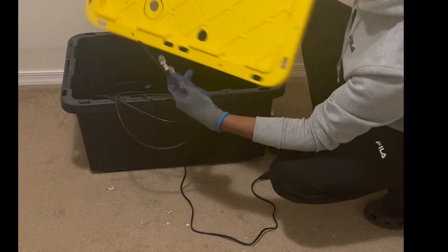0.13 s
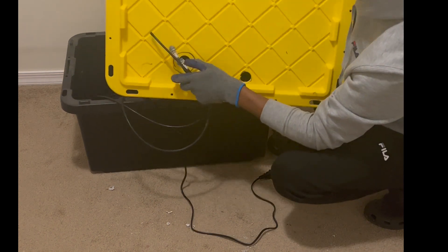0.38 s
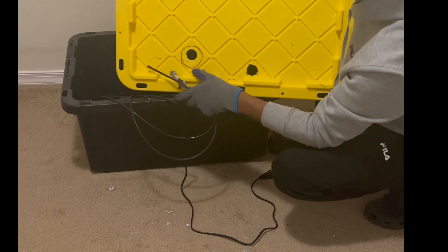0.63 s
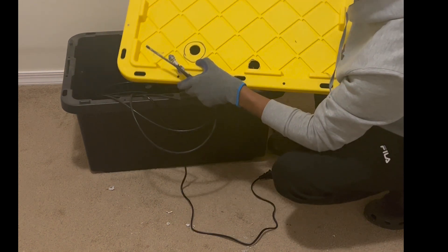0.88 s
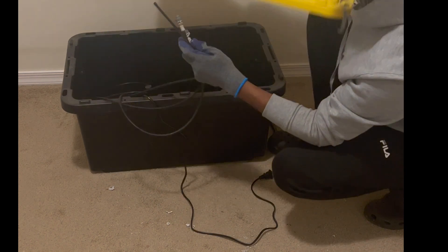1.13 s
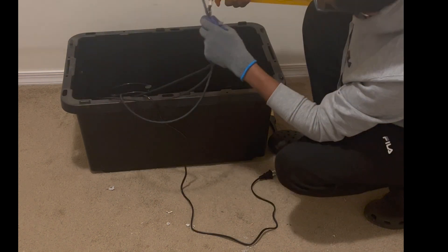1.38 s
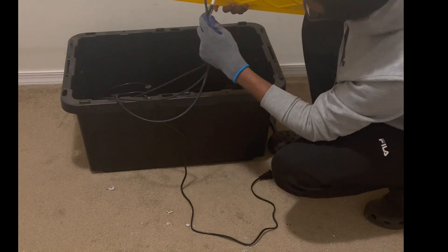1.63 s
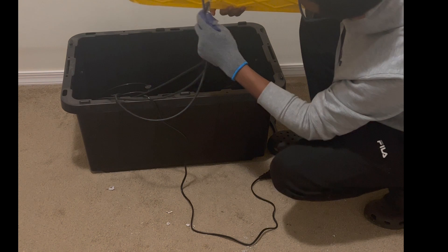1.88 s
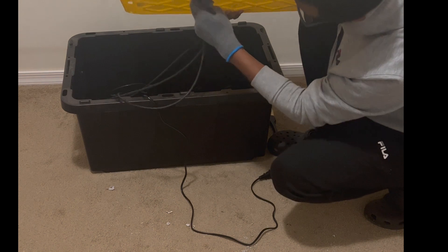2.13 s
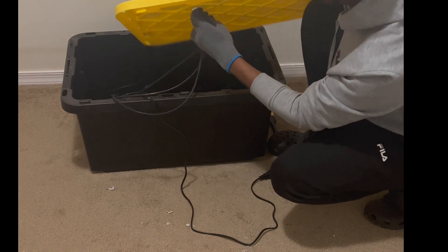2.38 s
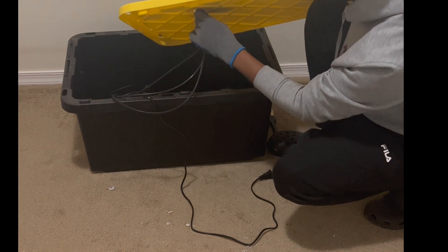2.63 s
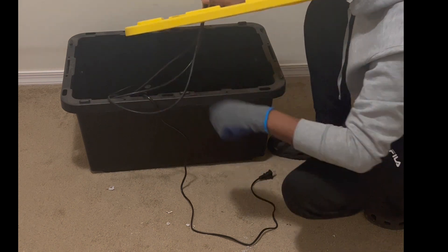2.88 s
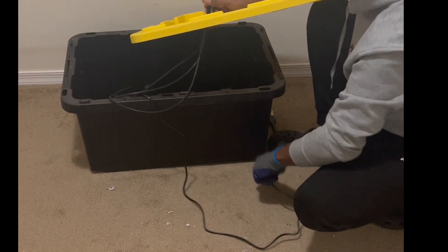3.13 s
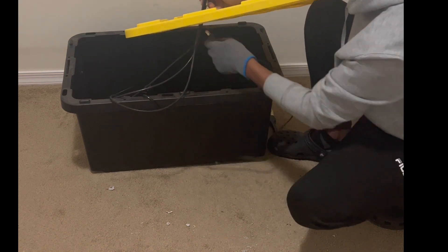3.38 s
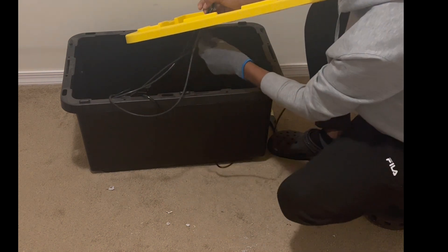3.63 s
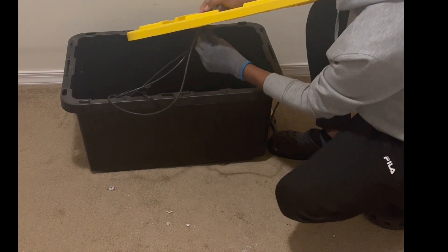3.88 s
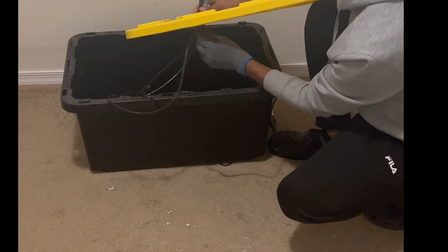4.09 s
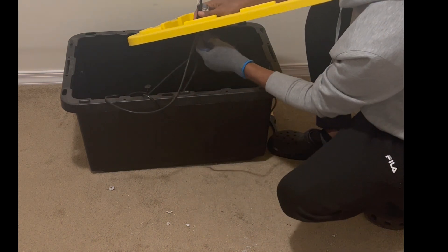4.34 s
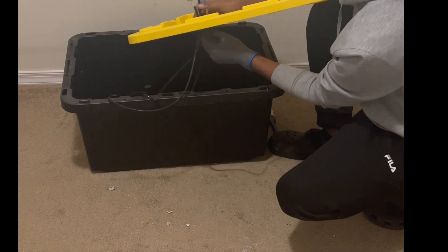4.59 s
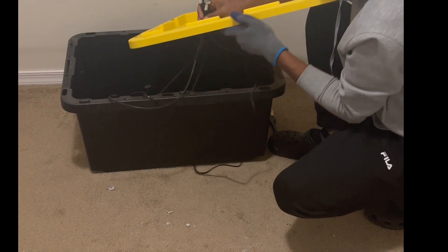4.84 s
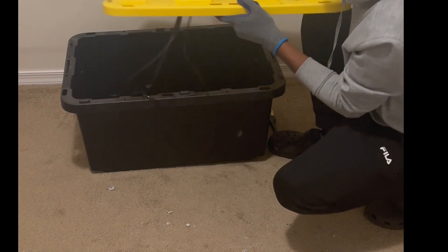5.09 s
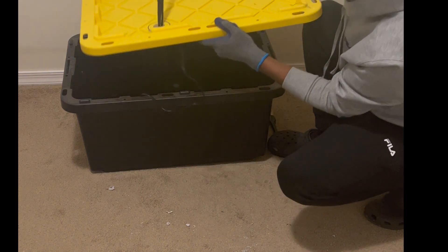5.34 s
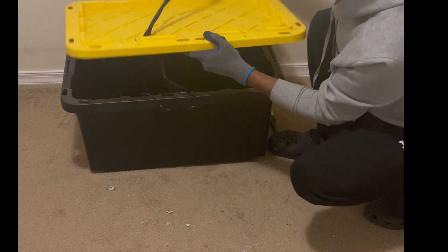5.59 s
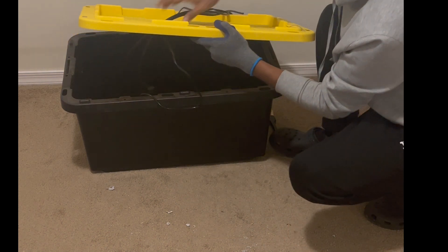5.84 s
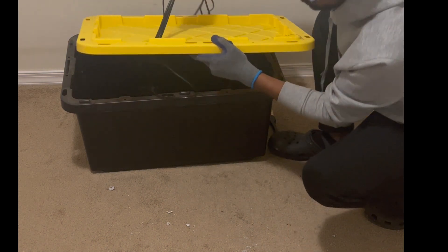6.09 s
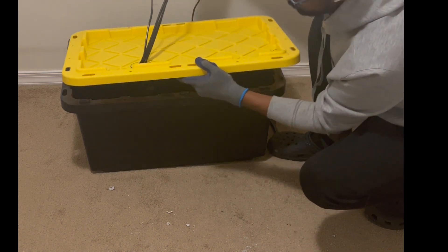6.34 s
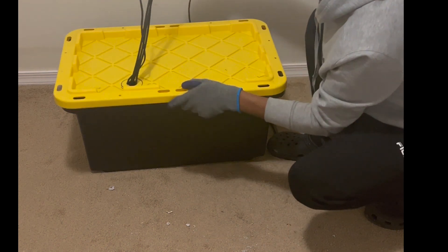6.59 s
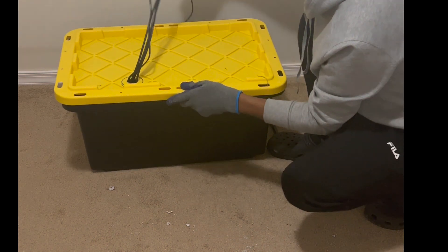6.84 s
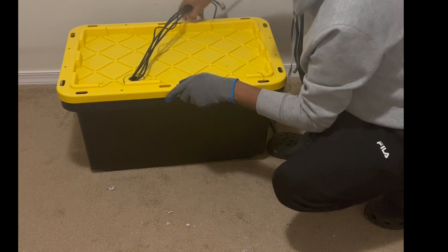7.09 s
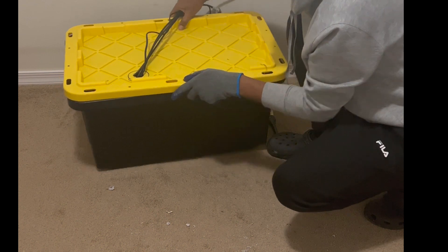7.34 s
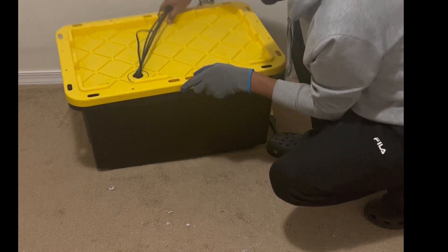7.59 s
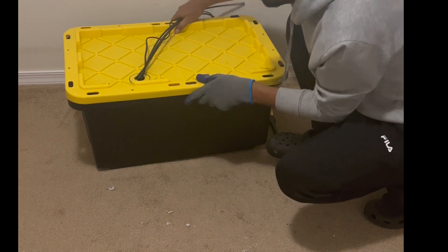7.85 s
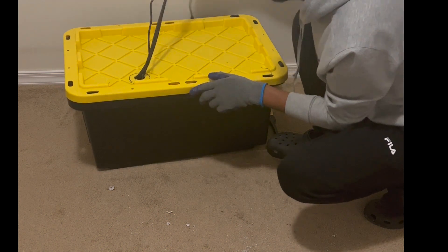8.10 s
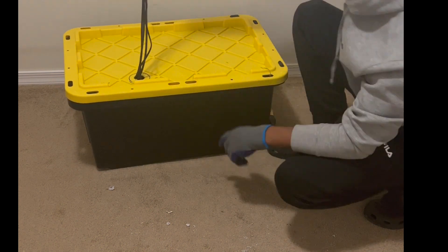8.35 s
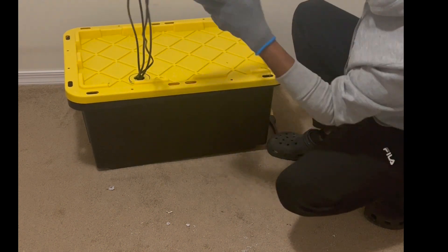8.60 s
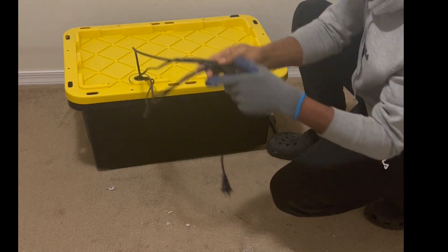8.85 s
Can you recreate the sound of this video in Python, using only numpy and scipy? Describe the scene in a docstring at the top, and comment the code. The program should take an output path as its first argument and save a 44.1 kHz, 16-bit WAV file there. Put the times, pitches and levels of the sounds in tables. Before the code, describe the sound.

Close stereo microphones in a small carpeted room, short soft echo, faint low hum and hiss. At about 0.25 s a plastic lid bumps with a clack and soft thump, then rubs and rattles until 1 s. From 1 to 2.4 s there are quiet glove scuffs, light taps and a duller knock near 1.4. A sharp clack comes at 2.5, another at 2.85, then a lull around 3. Cord and plug clicks follow at 3.4, 4.5 and 4.8 amid dry scraping. At 5.7 s a very loud hard crack rings briefly with a burst of rubbing. Scuffs lead to a heavy hollow lid bump at 6.6. From 7 to 7.85 s knocks, shaking and rubbing are dense, boxy and loud, with strong blows near 7.2, 7.65 and 7.75. A final sharp double clack falls around 8.15, then light scuffs, a small tap at 8.5 and near quiet until 9.

```python
"""In a small carpeted room, a hard plastic tote and its lid are handled close to two microphones.
A faint low hum and hiss, made of steady noise, lie underneath. Gloves and cords rub over the plastic:
streams of fine grains, plus panels shaken under the hands. Knocks of lid, rim, cords and plugs make
the panels ring like sets of dying sine tones; soft thumps shake only the lowest panels.
Noise tails add the room, and a noise gate turns down the quiet moments."""
import sys
import numpy as np
from scipy import signal
from scipy.fft import rfft, irfft, next_fast_len
from scipy.io import wavfile
from scipy.ndimage import uniform_filter1d

SR = 44100
rng = np.random.default_rng(int(sys.argv[2]) if len(sys.argv) > 2 else 0)


def amplitude_ratio(level_db):
    """Convert a level in decibels to the matching linear amplitude (field) ratio."""
    exponent = np.asarray(level_db, float) / 20
    return 10 ** exponent


def int16_out(signal):
    """Quantize to a 16-bit WAV file."""
    q = np.round(np.clip(np.atleast_2d(signal).T, -1, 1) * 32767)
    wavfile.write(sys.argv[1], SR, q.astype(np.int16))


N = 395577   # length in samples, about 9 s


def rms_one(x):
    """Scales a sound to rms 1."""
    return x / np.sqrt(np.mean(x ** 2) + 1e-20)


def at_hz(points, hz):
    """Reads a table between its rows on a log-frequency axis."""
    table = np.array(points)
    return np.interp(np.log(hz), np.log(table[:, 0]), table[:, 1])


def curves(rows):
    """Turns rows of (t/s, level/dB, ..) into gains over time, one per level column."""
    s, *columns = np.transpose(rows)
    return [amplitude_ratio(np.interp(np.arange(N) / SR, s, c)) for c in columns]


def coloured(x, spectrum):
    """Shapes a sound by a table of (f/Hz, level/dB)."""
    size = next_fast_len(len(x) + 4096)
    hz = np.arange(1, size // 2 + 2) * SR / size
    return irfft(rfft(x, size) * amplitude_ratio(at_hz(spectrum, hz)), size)[:len(x)]


def lowpass(x, hz):
    """Keeps what lies below hz, without delay."""
    return signal.sosfiltfilt(signal.butter(2, hz, fs=SR, output="sos"), x)


def ring(force, hz, t60):
    """A unit click sets a sine of height 1 ringing; it takes at least 5 ms to fall by 60 dB."""
    r, w = amplitude_ratio(-60 / (max(t60, .005) * SR)), 2 * np.pi * hz / SR
    return signal.lfilter([0, np.sin(w)], [1, -2 * r * np.cos(w), r * r], force + 1e-18)


def fade(x, seconds):
    """One-pole smoothing: each impulse keeps its height and dies away."""
    return signal.lfilter([1], [1, -np.exp(-1 / (max(seconds, 1e-4) * SR))], x + 1e-18)


def grains(per_s, spread_db):
    """Random clicks of uneven size and either sign, rms 1."""
    sizes = amplitude_ratio(spread_db * np.minimum(rng.exponential(1, N), 5)) * rng.choice([-1, 1], N)
    return rms_one(sizes * (rng.random(N) < per_s / SR))


def slow_wander(seconds):
    """A smooth random up-and-down, rms 1."""
    return rms_one(fade(fade(rng.standard_normal(N), seconds), seconds))


def patchy(x, patch_db, patch_s):
    """The colour shifts: bands split at 1, 2, 4 and 8 kHz swell and sink on their own."""
    lows = [lowpass(x, hz) for hz in 1000 * 2. ** np.arange(4)]
    bands = np.diff([0 * x, *lows, x], axis=0)
    return sum(band * amplitude_ratio(patch_db * slow_wander(patch_s)) for band in bands)


# Colour of the hum before it is set to one overall level: (f/Hz, level/dB)
HUM_COLOUR = [(35, -32.5), (60, -5), (124, 18), (254, -6.5), (319, 4), (380, 1), (1500, -15.5), (1950, -46),
              (3300, -120)]


def hum():
    """Faint steady noise of the building, strongest in the bass, and an even hiss."""
    low = rms_one(coloured(rng.standard_normal(N), HUM_COLOUR))
    hiss = rng.standard_normal(N)
    return amplitude_ratio(-72.5) * low + amplitude_ratio(-88) * hiss


# Strokes of gloves and cords: (t/s of peak, level/dB, treble lift level/dB,
# t/s to swell 20 dB, t/s to fade 20 dB); both times are held within 0.006 to 0.6 s
STROKES = [(.06, -65.5, 8, 0, .6), (.27, -47.5, 0, 0.13, 0.3), (.57, -60.5, -3.5, 0.7, -0.5),
           (.845, -56, 2.5, 0.4, -0.04), (.966, -55.5, 6, 0.1, 0.2), (1.048, -59, 4.5, -0.06, 0.2),
           (1.21, -66, 2, 0, 0.3), (1.371, -59, 1, 0, 0.15), (1.576, -62, 5.5, 0.1, .12),
           (1.783, -62, 6, 0.05, 0.43), (1.94, -56, 3, 0.1, .12), (2.14, -56.5, 2.5, 0.07, 0.5),
           (2.311, -58.5, 2.5, 0.1, 0.3), (2.541, -57.5, 3.5, 0.06, 0.4), (2.771, -55.5, 1.5, 0.3, 0.2),
           (3.101, -62.5, 5, 0.1, 0.4), (3.374, -58.5, 7, 0.14, 0.16), (3.431, -57, -4, 0.26, 0.2),
           (3.59, -59.5, -1, 0.1, 0.44), (3.84, -63, -5, -0.1, -0.5), (3.95, -57.5, 5, 0.16, .12),
           (4.128, -60, 3, 0.2, .1), (4.231, -58.5, -1.5, 0.14, 0.4), (4.32, -58, -1, 0.3, .1),
           (4.511, -56.5, -1.5, 0.12, 1), (4.711, -61, 3.5, 0.46, 0.1), (4.831, -52, 2.5, 0.12, 0.4),
           (5.051, -52, 4.5, 0.1, 0.5), (5.382, -59.5, 7, 0.4, 0.33), (5.53, -61, 2.5, .2, 0.5),
           (5.72, -48.5, -4, 0.22, 1), (6.082, -55, 3, 0.5, 0.4), (6.171, -52.5, 7, 0.22, 0.2),
           (6.421, -55, 4, 0.16, 0.4), (6.59, -48.5, -2, 0.33, 0.2), (6.74, -57, 0, -0.4, 0.2),
           (6.875, -58.5, 8.5, .02, 0.2), (7.036, -49.5, -1.5, 0.06, .28), (7.221, -44.5, -4, 0.13, 0.36),
           (7.391, -51.5, -8, .1, 0.3), (7.521, -49.5, -5, 0.2, 0.3), (7.651, -49, -6, 0.2, 0.4),
           (7.82, -47, 0.5, 0.1, 0.08), (7.931, -56, 3, -0.1, 0.7), (8.171, -52.5, 0, 0.25, 0.27),
           (8.32, -60, 0.5, 0, 0.18), (8.556, -55, 5, 0.08, 0.11), (8.791, -70.5, 4, 0, 0),
           (8.901, -64, 5, 0.2, 0)]


def strokes():
    """Gains of the strokes below and above the treble split; overlapping strokes add in power."""
    t, power = np.arange(0, N + 64, 64) / SR, 0
    for s, db, lift_db, swell_s, fade_s in STROKES:
        seconds_per_20_db = np.clip(np.where(t < s, swell_s, fade_s), .006, .6)
        shape = amplitude_ratio(db - 20 * np.abs(t - s) / seconds_per_20_db)
        lift = amplitude_ratio(np.array([[0], [lift_db]]))
        power = power + (shape * lift) ** 2
    return [np.interp(np.arange(N) / SR, t, gain) for gain in np.sqrt(power)]


# Large panels of tote and lid: (f/Hz, relative level/dB, t/s to die by 60 dB when undamped)
PANELS = [(116, -27.5, 0.18), (137, -14.5, .15), (186, -13.5, 0.078), (202, -10.5, 0.076),
          (277, -5.5, 0.073), (316.7, -0.5, 0.092), (342.2, -0.5, 0.093), (397.5, -1.5, 0.08),
          (480, 0, 0.046), (514.3, -3.5, 0.067), (589, -1, 0.063), (670, -3.5, 0.048), (777, -2.5, 0.033),
          (917, -10.5, 0.086), (1385, -7, 0.025)]
# Hands shaking the panels: (t/s, low panels level/dB, higher panels level/dB)
SHAKING = [(0.0, -92, -100), (0.22, -61, -78.5), (0.4, -58.5, -50.5), (1.67, -73, -93.5),
           (2.47, -69.5, -62.5), (2.75, -58, -59), (3.05, -71.5, -65), (4.37, -66, -69), (5.02, -60, -61),
           (5.64, -63, -58.5), (5.95, -70, -80), (6.27, -89, -62), (7.22, -70, -51), (7.47, -68, -59.5),
           (7.72, -56, -41.5), (7.92, -76, -61), (8.34, -66.5, -65), (8.97, -72, -81)]
# Colour of the fine rubbing grains: (f/Hz, relative level/dB)
SCUFF_COLOUR = [(530, -36), (900, 5.5), (2120, -2), (3510, 4), (4050, 0.5), (12100, -7), (16000, -15)]


def rubbing(damping, grain_db, catch_db):
    """Gloves and cords drag over the plastic in fits: fine grains, and panels shaken under a damping hand."""
    (low_gain, mid_gain), (scuff_gain, treble_gain) = curves(SHAKING), strokes()

    shake = fade(grains(400, 3.0), .0003)
    low = sum(amplitude_ratio(db) * ring(shake, hz, damping * t60) for hz, db, t60 in PANELS if hz < 220)
    mid = sum(amplitude_ratio(db) * ring(shake, hz, damping * t60) for hz, db, t60 in PANELS if hz > 220)

    # strokes catch unevenly, with small separate catches on top
    fits = amplitude_ratio(catch_db * slow_wander(0.014))
    catches = rms_one(fade(np.abs(grains(90, 2.0)), .003))
    fits = fits * np.hypot(1, amplitude_ratio(-8) * catches)
    rough = rng.standard_normal(N) + amplitude_ratio(grain_db) * grains(1200, 4.0)
    fine = coloured(fits * rough, SCUFF_COLOUR)
    fine = rms_one(patchy(fine, patch_db=2.5, patch_s=0.02))

    dull = lowpass(fine, 6000)   # the treble lift acts on the rest
    mid_gain = np.hypot(mid_gain, amplitude_ratio(-3.5) * scuff_gain)   # strokes also shake the higher panels
    panels = low_gain * rms_one(low) + mid_gain * rms_one(mid)
    return panels + scuff_gain * dull + treble_gain * (fine - dull)


# Dense small modes of ribs and rim: (f/Hz, relative level/dB)
RIB_COLOUR = [(700, -5), (1500, -0.5), (2800, -7.5), (4300, -5), (6500, -11), (15500, -15.5)]
# How long they ring: (f/Hz, t/s to die by 60 dB); ring() lengthens anything under 0.005 s
RIB_T60 = [(700, .016), (3000, .006), (15000, .0015)]


def all_modes():
    """The large panels plus a dense field of broad small modes of ribs and rim."""
    hz = np.geomspace(700, 15500, 66) * rng.uniform(.99, 1.01, 66)
    return list(PANELS) + list(zip(hz, at_hz(RIB_COLOUR, hz), at_hz(RIB_T60, hz)))


# Knocks: (t/s, clack level/dB, boom level/dB, body level/dB, chatter t/s), levels relative
KNOCKS = [(0.239, -34.5, -36.5, -13, 0.0077), (0.263, -19, -39.5, -35, 0.022),
          (0.3438, -32, -42, -34.5, 0.012), (0.409, -27, -42, -37, 0.0091),
          (0.451, -32, -43, -28.5, 0.0076), (0.5499, -40, -51, -43.5, 0.02),
          (0.613, -34.5, -88, -30, 0.0073), (0.659, -29.5, -64, -30.5, 0.01),
          (0.738, -45.5, -58, -42, 0.01), (0.804, -40, -68, -38, 0.0076), (0.842, -40.5, -46, -48, .012),
          (0.9573, -41, -49, -33, 0.015), (1.0455, -37, -44.5, -37, 0.011), (1.19, -65.5, -46, -50, 0.014),
          (1.3596, -33, -33, -33.5, 0.019), (1.572, -40.5, -38, -45.5, 0.013),
          (1.617, -45.5, -49, -47, 0.017), (1.7744, -40, -54.5, -43, 0.014), (1.92, -39.5, -52, -41, 0.03),
          (2.0865, -39.5, -44.5, -56, 0.077), (2.1336, -35.5, -83, -40, 0.022),
          (2.202, -40.5, -47, -79, 0.013), (2.474, -43, -58, -66, 0.01), (2.49, -36, -42, -32, 0.0094),
          (2.5147, -20.5, -30, -28, 0.0091), (2.5845, -30, -35, -35, 0.0082),
          (2.779, -41.5, -41, -50, 0.016), (2.8565, -23, -39.5, -24, 0.011), (2.9342, -39, -49, -34, 0.011),
          (3.0479, -49, -50, -61, 0.057), (3.3249, -57, -45, -36, 0.0034), (3.359, -27, -49, -45, 0.012),
          (3.413, -23, -35.5, -30, 0.015), (3.5243, -48, -41.5, -59, 0.01),
          (3.6927, -46, -49.5, -59, 0.032), (3.9707, -47.5, -48.5, -48, 0.06),
          (4.2058, -35.5, -47, -44, 0.022), (4.2286, -28.5, -47, -37, 0.013),
          (4.489, -21, -40.5, -31, 0.013), (4.5467, -34, -43, -53, 0.026), (4.7033, -40.5, -66, -50, 0.013),
          (4.8, -31.5, -37, -42, 0.017), (4.8306, -24.5, -28.5, -36.5, 0.011),
          (4.926, -41.5, -39, -44, 0.049), (5.026, -33.5, -57, -77, 0.06),
          (5.1555, -30.5, -37.5, -43, 0.027), (5.2107, -29.5, -47, -40.5, 0.02),
          (5.252, -32, -50, -39.5, 0.047), (5.361, -40, -47, -47, 0.044), (5.675, -10.5, -32.5, -25, 0.014),
          (5.7114, -1.5, -40.5, -21, 0.025), (5.724, 2.5, -24.5, -19.5, 0.009),
          (5.892, -33.5, -29.5, -35, 0.0038), (5.9516, -31, -39, -26, 0.012),
          (6.025, -31.5, -41, -31, 0.021), (6.0579, -30, -48.5, -37.5, 0.033),
          (6.1002, -39, -43, -28.5, 0.027), (6.15, -31.5, -37.5, -38.5, 0.047),
          (6.273, -34.5, -36.5, -39.5, 0.0057), (6.327, -44.5, -50, -45.5, 0.01),
          (6.393, -21, -34, -22.5, 0.015), (6.4857, -33, -38, -45, 0.0038),
          (6.562, -36.5, -36.5, -34.5, 0.022), (6.586, -12, -15.5, -14.5, 0.018),
          (6.606, -20, -21, -13.5, 0.018), (6.7185, -40, -56, -26, 0.0095), (6.729, -35, -37, -26, 0.015),
          (6.779, -30.5, -28.5, -25, 0.012), (6.8674, -41.5, -34, -40.5, 0.028),
          (6.9147, -34, -37, -18, .014), (7.0217, -15, -24.5, -22.5, 0.012),
          (7.0757, -39.5, -23.5, -41, 0.0073), (7.101, -34, -58, -23, 0.018),
          (7.1767, -18.5, -28, -23, 0.01), (7.2094, -11, -44.5, -23.5, 0.0082),
          (7.268, -57, -30, -40.5, 0.0087), (7.2952, -25.5, -61, -25.5, 0.0069),
          (7.38, -31.5, -40.5, -24, 0.016), (7.448, -42.5, -48, -40.5, 0.013),
          (7.498, -34, -33, -31.5, 0.032), (7.615, -34.5, -33, -28, 0.017),
          (7.637, -9, -22.5, -16.5, 0.019), (7.729, -11.5, -19, -30.5, 0.016),
          (7.793, -14.5, -17.5, -22.5, 0.014), (7.9265, -35, -44, -35, 0.022),
          (8.0438, -39.5, -39, -45.5, 0.01), (8.1188, -13, -35.5, -15, .013),
          (8.153, -7.5, -24.5, -22, 0.007), (8.2727, -48.5, -39.5, -47, 0.02),
          (8.315, -38, -43, -40, 0.011), (8.419, -53, -73.5, -51, 0.03), (8.535, -26.5, -33.5, -35, 0.013)]
# Centres of boom, body, clack and tick: (f/Hz)
REGISTERS = [330, 1100, 3500, 9500]


def knocks(touch_db, swell_s, boom_db, rib_db):
    """A first touch and a chatter of contacts drive every mode with its own strength."""
    s, clack, boom, body, chatter_s = np.transpose(KNOCKS)
    # a blow richer in clack than body is also richer in tick
    tick = clack - 7.5 + 0.096 * (clack - body)

    # each new blow takes over from the one before; panels already ringing go on
    at = np.round(s * SR).astype(int)
    latest = np.maximum(np.searchsorted(at, np.arange(N), "right") - 1, 0)
    since = (np.arange(N) - at[latest]) / SR
    lasting = np.clip(chatter_s, .002, .12)[latest]
    dying = np.exp(-(np.abs(since) / lasting) ** 1.44) * (since >= 0)
    chatter = grains(6000, 1.92) * dying / np.sqrt(0.00097 * SR)
    stronger_start = 1 + 0.49 * np.exp(-np.abs(since) / 0.0012)
    hard = chatter * stronger_start + amplitude_ratio(touch_db) * (since == 0)

    # big panels take up the blow slowly, so the boom swells after the click
    uptake_s = swell_s + 0.32 * lasting
    rise = np.maximum(since, 0) / uptake_s
    swell = rise * np.exp(1 - rise) / np.sqrt(0.024 * SR)
    soft = swell * rng.standard_normal(N)
    in_step = swell / np.sqrt(uptake_s * SR)

    modes, out = all_modes(), np.zeros(N)
    panel_count = len(PANELS)
    signs = rng.choice([-1, 1], (3, N))   # neighbouring modes are pushed in unrelated directions
    luck = rng.standard_normal((len(s), len(modes)))
    luck = luck + 5 * uniform_filter1d(luck, size=7, axis=1)   # each blow also favours whole regions
    # for the panels, luck shifts the colour but averages to 0 dB
    luck[:, :panel_count] -= luck[:, :panel_count].mean(axis=1, keepdims=True)
    phase = rng.uniform(0, 2 * np.pi, luck.shape)
    clean_share = 0.7   # part of a panel's driving power that swings cleanly
    for k, (hz, level_db, t60) in enumerate(modes):
        is_panel = k < panel_count
        place = np.interp(np.log(hz), np.log(REGISTERS), np.arange(4))
        nearness = np.maximum(1 - np.abs(place - np.arange(4)), 0)
        blow_db = nearness @ [boom, body, clack, tick]
        group_db = boom_db if is_panel else rib_db
        gain = amplitude_ratio(blow_db + level_db + group_db + 1.3 * luck[:, k])
        slow = np.clip(0.56 * (1.9 - place), 0, 1)   # low modes follow the slow push, high ones the chatter
        force = signs[k % 3] * (slow * soft + (1 - slow) * hard)
        if is_panel:   # a panel is also driven cleanly at its own pitch
            clean = slow * in_step * np.cos(2 * np.pi * hz * since + phase[latest, k])
            force = np.sqrt(1 - clean_share) * force + np.sqrt(clean_share) * clean
        out += ring((-1) ** k * gain[latest] * force, hz, t60)
    return out


# Soft thumps of the tote's bottom: (t/s, relative level/dB)
THUMPS = [(0.271, -29.5), (0.498, -33.5), (0.852, -44), (1.261, -39), (2.526, -32), (2.867, -37),
          (4.655, -32.5), (4.684, -40), (4.83, -41), (5.677, -41), (6.41, -36.5), (6.485, -38.5),
          (6.589, -63), (7.033, -28.5), (7.216, -31), (7.65, -45.5), (7.81, -36), (8.164, -54)]


def thumps(push_s, level_db):
    """A soft, rounded push shakes only the lowest panels."""
    s, thump_db = np.transpose(THUMPS)
    push = np.zeros(N)
    push[np.round(s * SR).astype(int)] = amplitude_ratio(thump_db + level_db)
    push = fade(fade(push, push_s), push_s) / (push_s * SR) ** 2
    return sum(amplitude_ratio(db) * ring(push, hz, t60) for hz, db, t60 in PANELS if hz < 160)


# How long the room's echo lasts: (f/Hz, t/s to die by 60 dB)
ROOM_T60 = [(150, 0.24), (1500, 0.18), (14000, 0.15)]


def room(x, first_echo_s):
    """Noise tails die band by band; the source moves about, so the sound wanders among three tails."""
    t, out = np.arange(SR // 2) / SR, 0
    turn = 2 * np.pi * 2.3 * np.arange(N) / SR   # wanders at a steady 2.3 Hz
    for k in range(3):
        tail = 0
        for low in 60 * 2. ** np.arange(8):
            octave = signal.butter(2, [low, 2 * low], "band", fs=SR, output="sos")
            noise = signal.sosfilt(octave, rng.standard_normal(len(t)))
            tail = tail + noise * amplitude_ratio(-60 * t / at_hz(ROOM_T60, low))
        tail = tail * (t > first_echo_s)
        tail = tail / np.sqrt(np.sum(tail ** 2))
        share = np.sqrt(2 / 3) * np.cos(turn + k * np.pi / 3)
        out = out + signal.fftconvolve(share * x, tail)[:N]
    return out


def handling():
    """Rubbing, knocks and thumps heard in the room over the hum."""
    near = rubbing(damping=0.96, grain_db=-6, catch_db=1.8)
    near = near + knocks(touch_db=-6.5, swell_s=0.0029, boom_db=-1.0, rib_db=-12.5)
    near = near + thumps(push_s=0.0011, level_db=12.5)
    return hum() + near + amplitude_ratio(-9) * room(near, first_echo_s=0.0088)


# How much louder the shared sound is on the left: (f/Hz, level/dB)
LEFT_LOUDER = [(200, .3), (1000, 2.2), (2200, 0), (15000, .2)]
# How far the shared sound leads in phase on the left, negative is behind: (f/Hz, phase/rad)
LEFT_LEADS = [(9900, 0), (11000, -1.0), (16000, -1.1)]


def microphone(x, half):
    """One port's share of the level and phase difference between the two."""
    hz = np.arange(1, N // 2 + 2) * SR / N
    louder = amplitude_ratio(half * at_hz(LEFT_LOUDER, hz))
    phase_shift = np.exp(1j * half * at_hz(LEFT_LEADS, hz))
    return irfft(rfft(x) * louder * phase_shift, N)


# Left-right difference against the shared sound: (f/Hz, level/dB)
SIDE_LEVEL = [(90, -34.5), (330, -27.5), (1100, -7), (3000, -3), (3200, -39), (4900, -34), (6000, -5),
              (7100, -29), (9900, -30.5), (10500, -7), (15000, -6)]


def scene():
    """Two microphones share most of the sound; what differs has the same events but its own detail."""
    mid, side = handling(), coloured(handling(), SIDE_LEVEL)
    left = microphone(mid, 1 / 2) + side
    right = microphone(mid, -1 / 2) - side
    return np.array([left, right])


def gate(x, open_db, slope, depth_db, hold_s):
    """Pushes a band down when it falls quiet: slope dB per dB below open_db; opens fast, closes late."""
    power = uniform_filter1d(np.mean(x ** 2, axis=0), size=441)   # 10 ms average of both sides
    held = fade(power, hold_s) / (hold_s * SR)
    level_db = 10 * np.log10(np.maximum(power, held) + 1e-14)
    return x * amplitude_ratio(np.clip(slope * (level_db - open_db), -depth_db, 0))


def top_cut(x):
    """Nothing passes above the cut-off."""
    return signal.sosfilt(signal.butter(12, 16500, fs=SR, output="sos"), x)


def record(dry):
    """Steep bass roll-off, a noise gate in three bands, then a gain that rounds the peaks."""
    x = signal.sosfilt(signal.butter(4, 95, "high", fs=SR, output="sos"), dry)
    bass = lowpass(x, 700)
    treble = signal.sosfiltfilt(signal.butter(2, 5000, "high", fs=SR, output="sos"), x)
    middle = x - bass - treble
    gated = (gate(bass, open_db=-45.5, slope=0.39, depth_db=18, hold_s=0.023)
             + gate(middle, open_db=-53.5, slope=0.4, depth_db=25, hold_s=0.0031)
             + gate(treble, open_db=-52.5, slope=0.54, depth_db=25, hold_s=0.0078))
    mix = 1.796 * np.tanh(gated / 1.23)
    return top_cut(mix)


dry = scene()
out = record(dry)
int16_out(out)
```